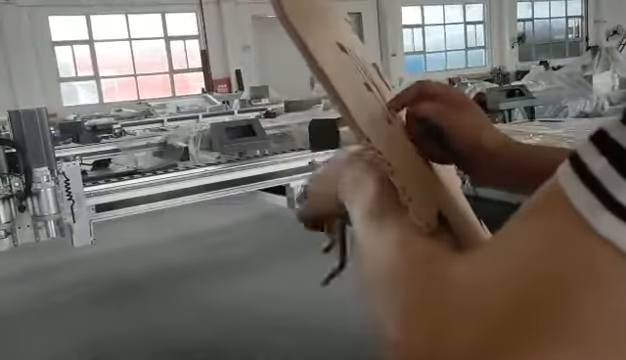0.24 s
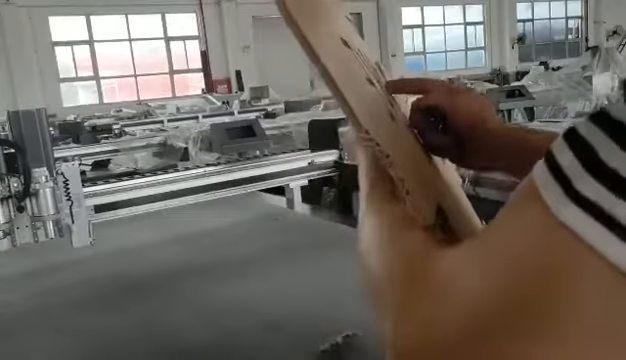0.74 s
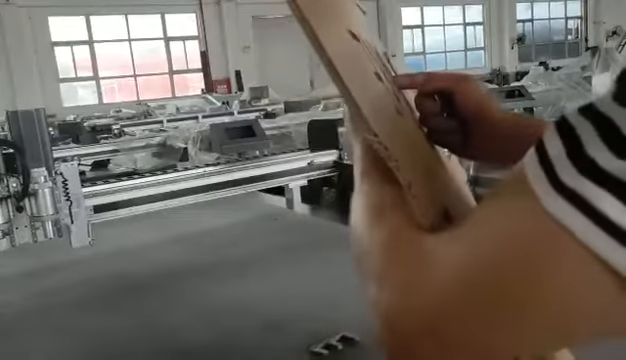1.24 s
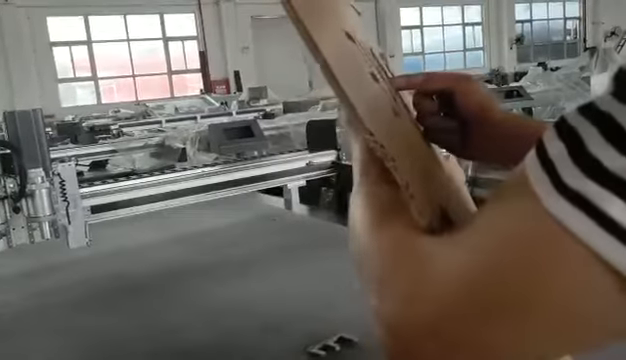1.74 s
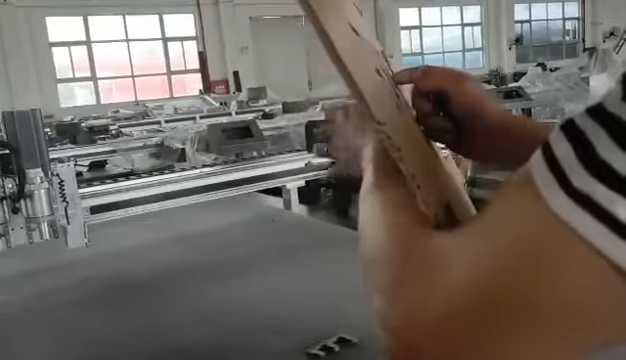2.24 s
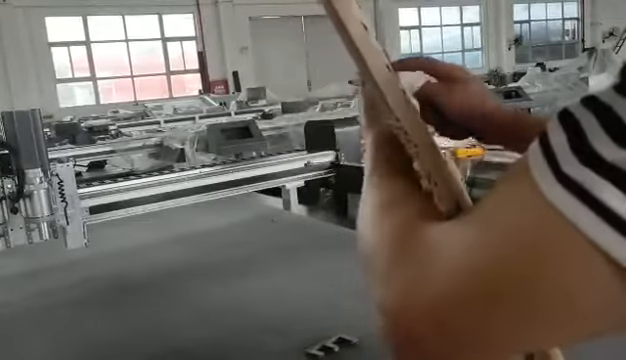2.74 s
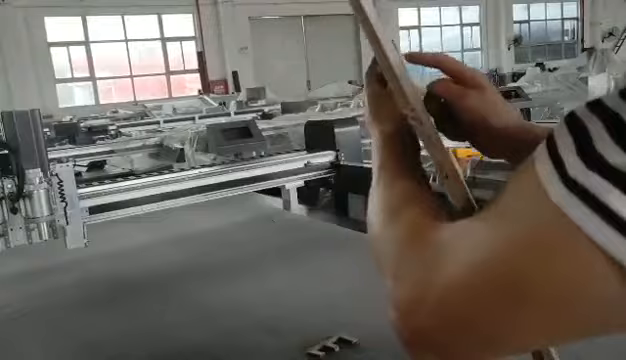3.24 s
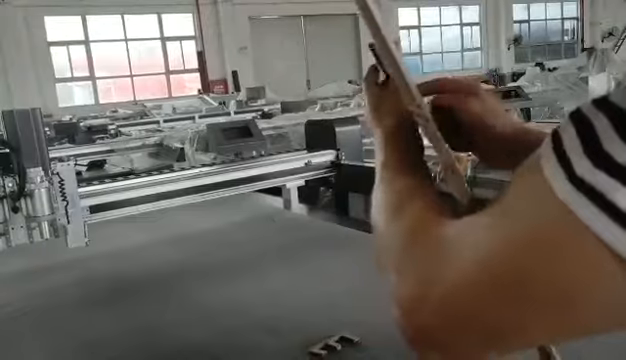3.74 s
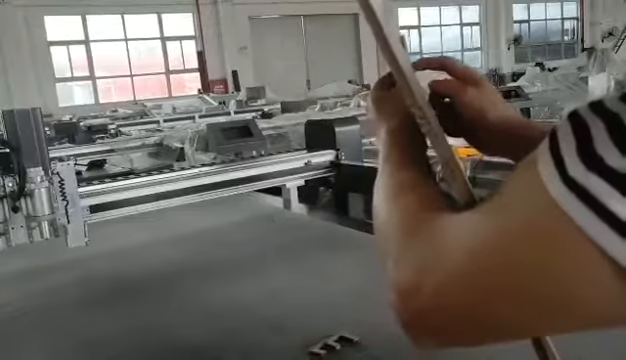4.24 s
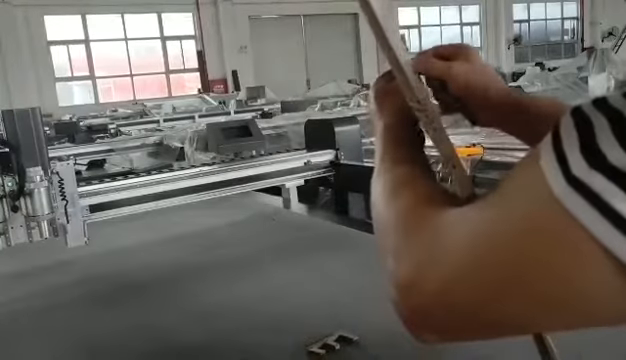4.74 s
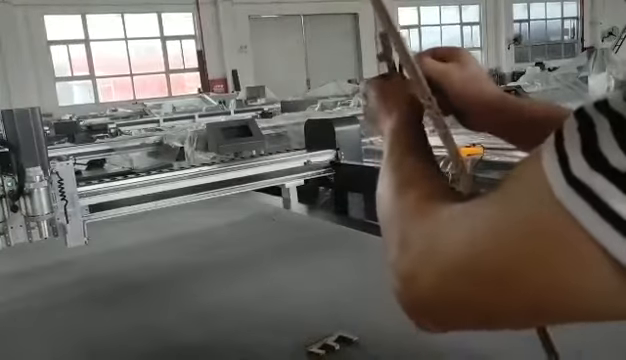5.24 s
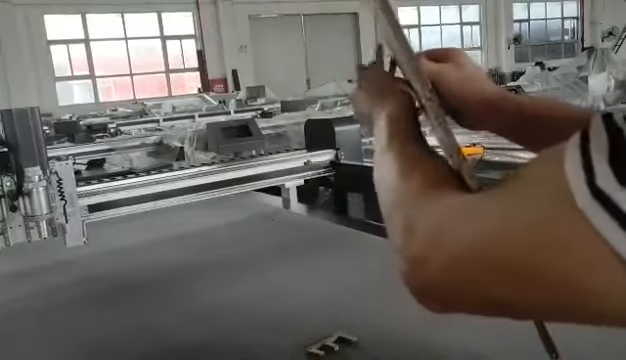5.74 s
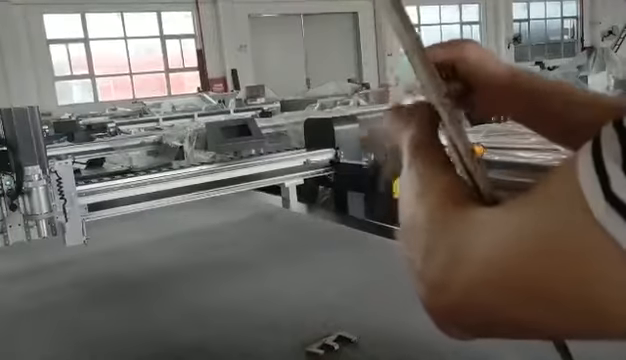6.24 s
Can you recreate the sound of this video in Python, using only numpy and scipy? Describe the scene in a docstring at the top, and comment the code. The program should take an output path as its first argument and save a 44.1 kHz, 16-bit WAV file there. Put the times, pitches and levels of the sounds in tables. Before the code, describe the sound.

Cardboard breaks apart by hand in a big hall: crisp irregular clicks, a little rattle around two seconds, then a dense loud crackle just after three and more hard snaps soon after. Sparser, softer ticks lead to a last tight group near six. Most cracks sit slightly left, close and dry, with a short room tail. Behind are faint air noise, swelling hum and dull far-off booms.

```python
"""Cardboard pieces pushed out in a workshop

Fingers push pre-cut pieces out of a cardboard sheet: the board crinkles and rattles (random ticks), fibre
bridges snap in quick clusters (noisy pulses through ringing bodies) and shed loose fibres. The stiff sheet
knocks at many breaks, and a big hall (decaying noise) rings after them. Behind lie steady ventilation and
drone, a faint hum that swells and fades, and far-off rumbles and booms (bands of noise). The recorder's
noise suppressor turns down faint treble.
"""
import sys
import numpy as np
from scipy import signal
from scipy.fft import rfft, irfft, next_fast_len
from scipy.io import wavfile
from scipy.ndimage import uniform_filter1d, map_coordinates

SR = 44100
rng = np.random.default_rng(int(sys.argv[2]) if len(sys.argv) > 2 else 0)


def wav_record(signal):
    """Record a signal, one row per channel, as 16-bit PCM in the file named by sys.argv[1]."""
    frames = np.transpose(np.atleast_2d(signal))
    bounded = np.clip(frames, -1, 1)
    # unit amplitude maps onto the largest positive 16-bit level
    quanta = np.round(bounded * 32767).astype(np.int16)
    wavfile.write(sys.argv[1], SR, quanta)


N = 286650

# Fibre bridges breaking: (time [s], crack level [dB], flex level [dB], crack left over right [dB])
BREAKS = [(0.1318, -30, -50, 11), (0.1504, -24.5, -46.5, 6), (0.392, -31, -59.5, 12),
          (0.5476, -30.5, -44, 0), (0.7629, -30, -50, 4.5), (0.843, -44, -62, -5), (0.8724, -36, -52, 9),
          (0.8874, -28.5, -57.5, 4), (1.1905, -30, -58.5, 9.5), (1.26, -32.5, -82, 7), (1.296, -22, -72, 5),
          (1.314, -36, -83, 10), (1.3347, -28.5, -57.5, 0), (1.4886, -37, -57.5, 2),
          (1.581, -37, -66.5, 10), (1.639, -34, -83, 5), (1.6896, -17.5, -38, 3.5), (1.707, -26, -57, 8.5),
          (1.7844, -32, -61, 1), (1.7938, -21, -40, 4), (1.8612, -25.5, -51.5, 0.5), (2.085, -33, -59.5, 5),
          (2.4929, -52, -63, -21), (2.6913, -46, -54, -8.0), (2.7376, -39.5, -49, 4),
          (2.7913, -32.5, -72, 4), (2.8074, -33, -63, 11.0), (2.814, -26, -46.5, 0.5),
          (3.0604, -38.5, -80.5, 6), (3.1106, -24, -58, 5), (3.1401, -21, -39.5, 10),
          (3.1561, -15.5, -34, 7.5), (3.1704, -21.5, -38, 8), (3.1789, -30.5, -39, 1),
          (3.5696, -32, -62.5, 7.5), (3.6466, -16.5, -39, 2), (3.6534, -17.5, -37, 8), (3.672, -25, -39, 9),
          (3.9707, -33, -51, -2.5), (4.581, -28, -47, 6), (4.6705, -28, -54.5, 2.5),
          (4.6939, -31.5, -57.5, -3), (4.8045, -44, -56.5, -0.5), (4.9671, -28, -58, -3),
          (5.1216, -40, -80, 8), (5.1608, -40.5, -85.5, 7.5), (5.5118, -30, -85, 3.5),
          (5.777, -33, -49.5, 8), (5.9208, -37.5, -70, 6), (5.9463, -19.5, -45.5, 7),
          (5.9785, -38, -45.5, 8), (5.9869, -21.5, -46, 3.5), (6.2214, -39, -88, 1),
          (6.2507, -33.5, -68.5, 2.0), (6.3948, -39.5, -62, 5)]
# Sheet knocks as a piece lets go: (time [s], level [dB], pitch [Hz])
SHEET_KNOCKS = [(0.15, -42, 1264), (0.766, -45.5, 414), (1.687, -52.5, 1080), (1.792, -38.5, 1165),
                (1.854, -50.5, 455), (2.491, -47, 803), (2.691, -50, 674), (3.144, -41.5, 595),
                (3.157, -39.5, 960), (3.177, -36.5, 301), (3.646, -34.5, 1100), (3.654, -42.5, 1180),
                (3.674, -44, 840), (4.968, -54.5, 1046), (5.775, -44, 1000), (5.939, -38, 1010),
                (5.959, -44, 880), (5.977, -38.5, 1000), (5.987, -44.5, 806)]
# Crinkles and rattles of the board, by finger pushes or a falling piece: (time [s], level [dB], rise [s])
CRINKLE_SWELLS = [(.03, -61, 0.26), (0.388, -48, 0.004), (0.719, -64, 0.0063), (0.871, -54, 0.022),
                  (1.18, -62.5, 0.064), (1.219, -51, 0.0032), (1.48, -54.5, 0.012), (1.75, -51, 0.043),
                  (1.855, -38.5, 0.0047), (2.092, -46.5, 0.013), (2.256, -61, 0.011), (2.745, -50, 0.015),
                  (3.073, -49, .005), (3.102, -47.5, 0.014), (3.158, -28.5, 0.012), (3.28, -41.5, .014),
                  (3.911, -49, 0.011), (4.446, -62.5, 0.021), (4.487, -55, 0.0048), (4.963, -49.5, .004),
                  (5.461, -54, 0.023), (5.507, -49, 0.019), (5.602, -57, .003), (5.642, -56.5, 0.008),
                  (5.792, -57, 0.023)]
# Colour of torn fibres: (frequency [Hz], gain [dB])
CRACK_COLOUR = [(2500, -43.5), (3900, -52), (4700, -7.5), (5800, -5), (7400, 12), (8400, 5), (9500, -3),
                (12000, -9.5), (14800, -17.5), (16500, -51.5)]
# Colour of the flexing piece: (frequency [Hz], gain [dB])
FLEX_COLOUR = [(1000, -29.5), (1650, -3.5), (2200, -5), (2900, 1), (3600, 0.5), (4600, 0), (5300, -5),
               (7000, -29.5)]
# Colour of the whole sheet: (frequency [Hz], gain [dB])
KNOCK_COLOUR = [(120, -31), (270, -11), (400, -3), (620, -6.5), (1100, -6.5), (1400, -10.5), (2100, -6),
                (3000, -27.5)]
# Hall decay by band, before stretching and the final drop: (frequency [Hz], T60 [s])
HALL_T60 = [(200, 0.92), (1000, 0.28), (4000, 0.31), (7500, 0.43), (14000, 0.37)]
# Colour of the hall's answer: (frequency [Hz], gain [dB])
HALL_GAIN = [(200, 9), (1000, 6.5), (3000, 5.5), (6000, 5.5), (8000, -2.5), (11000, 3), (15000, 7.5)]
# Hall ringing after a big break: (frequency [Hz], relative level [dB per Hz])
AFTERRING_COLOUR = [(120, -36), (200, -9.5), (332, -20), (383, -7), (503, -12.5), (647, -14), (734, -25),
                    (1070, -0.5), (1240, -6), (2850, -1.5), (4160, -3), (7280, 7.5), (15000, -73)]
# Swells of the faint hum: (time [s], level [dB], rise [s])
HUM_SWELLS = [(.03, -60.5, 0.033), (.73, -66.5, 0.037), (.97, -66, 0.061), (1.62, -67, 0.015),
              (2.178, -67.5, 0.021), (2.682, -57, 0.021), (3.031, -54.5, .018), (3.168, -54.5, 0.029),
              (3.922, -50, 0.032), (4.14, -63.5, 0.12), (5.63, -66.5, 0.035), (6.4, -62, 0.029)]
# Distant rumbles, even rise and fall: (middle [s], level [dB], time to fall by 20 dB [s])
FAR_RUMBLES = [(1.0, -79, 0.94), (3.33, -59, 0.18), (4.14, -45, 0.4722)]
# Colour of the rumbles: (frequency [Hz], relative level [dB per Hz])
RUMBLE_SPECTRUM = [(100, -43), (190, -16), (300, 4.5), (430, 5.5), (540, -11.5), (720, -14), (950, -28.5),
                   (1400, -31.5), (2500, -58.5)]
# Far-off hollow booms: (time [s], pitch [Hz], level [dB])
FAR_BOOMS = [(.26, 278, -61.5), (0.852, 273, -57.5), (.91, 531, -61), (.97, 780, -65), (1.11, 560, -66),
             (1.16, 930, -72.5), (1.239, 277, -66.5), (3.309, 333, -47.5), (3.31, 750, -64.5),
             (3.961, 436, -51), (4.11, 209, -57), (4.13, 308, -48), (4.18, 741, -60), (4.65, 406, -64.5)]
# Ventilation: (frequency [Hz], relative level [dB per Hz])
VENTILATION_COLOUR = [(15, -37.5), (28, -6), (60, -2.5), (114, -9), (212, -7.5), (263, -12), (363, -21),
                      (640, -18), (936, -23.5), (2600, -22.5), (4500, -27), (7300, -24), (9000, -26.5),
                      (11000, -26.5), (13000, -36.5), (16000, -57.5)]
# Diffuse sound, likeness of the channels: (frequency [Hz], left-right correlation [-1 to 1])
DIFFUSE_LIKENESS = [(60, 1), (130, 0.94), (300, 0.89), (640, 0.17), (1400, 0.047), (3000, -0.23)]
# Diffuse sound, balance: (frequency [Hz], left over right [dB])
DIFFUSE_PAN = [(100, 4), (400, 5.5), (1200, 4.5), (2500, 1.5), (4500, 7.5), (8000, 3.5)]

LEAD_S = 0.006  # fibres start to give this long before they part
TEAR_S, TEAR_SCATTER = 0.0021, 0.2  # fibres of one bridge part within this time; scatter as log deviation
CRACK_S, FLEX_S, KNOCK_S = 0.00099, 0.012, 0.004  # energy equals the level held this long
KNOCK_PAN_DB, FLEX_RIGHT_DB = -6, 9  # knock left over right; flex this much right of its crack
LOOSE_DB, LOOSE_T60_S = -26.5, 0.18  # loose-fibre crackle: level against its crack, decay
BOOM_RISE_S = 0.029
TOP_HZ = 15500  # recorder band limit


def cardboard():
    """The board crinkles, rattles, snaps, knocks and sheds loose fibres; the hall rings after it."""
    near = crinkling() + loose_fibres()
    for s, *blow in BREAKS:
        add(near, snap(*blow), s - LEAD_S)
    for s, db, pitch_hz in SHEET_KNOCKS:
        add(near, knock(db, pitch_hz), s - LEAD_S)
    far = earlier_break()
    step = SR // 5
    for start in range(0, N, step):  # the hall's noise is drawn afresh every fifth of a second
        add(far, hall(near[:, start:start + step], wet_db=-4.0), start / SR)
    return near + far


def snap(crack_db, flex_db, pan_db):
    """One break: a bright crack and the duller flex of the piece."""
    length_s = TEAR_S * np.exp(TEAR_SCATTER * rng.standard_normal())
    crack = tear(length_s, fuzz=1.2, fuzz_t60_s=0.007, apart=0.7, lead_db=-17)
    flex = tear(length_s, fuzz=1.6, fuzz_t60_s=0.021, apart=0.92, lead_db=-13)
    crack_body = ring(CRACK_COLOUR, ripple_db=1.0)
    flex_body = ring(FLEX_COLOUR, ripple_db=2.5)
    return (radiate(crack, crack_body, crack_db, CRACK_S, pan_db)
            + radiate(flex, flex_body, flex_db, FLEX_S, pan_db - FLEX_RIGHT_DB))


def knock(db, pitch_hz):
    """The longer, woody knock of the whole sheet, with one raised resonance."""
    force = tear(TEAR_S, fuzz=5.4, fuzz_t60_s=0.061, apart=1.0, lead_db=-18.5)
    body = ring(KNOCK_COLOUR, ripple_db=5.5, pitch_hz=pitch_hz, pitch_db=15.5)
    return radiate(force, body, db, KNOCK_S, KNOCK_PAN_DB)


def crinkling():
    """Bright fibre ticks that swell with each push or rattle."""
    level = sum(swell(*row, linger=1.0) for row in CRINKLE_SWELLS)
    return level * crinkle(rate_hz=1400, spread_db=8.5, flex_db=-15.5, tilt_db=2)


def loose_fibres():
    """Duller ticks that start at each break and die away."""
    t = np.arange(SR // 2) / SR
    loosened = np.zeros((1, N))
    for s, crack_db, *_ in BREAKS:
        add(loosened, amp(crack_db + LOOSE_DB - 60 * t[None] / LOOSE_T60_S), s)
    return loosened * crinkle(rate_hz=600, spread_db=10.0, flex_db=-11.5, tilt_db=-5.5)


def crinkle(rate_hz, spread_db, flex_db, tilt_db, count=5):
    """Random fibre ticks of a few colours, rms 1; tilt_db per octave brighter than a crack."""
    colour = [(hz, db + tilt_db * np.log2(hz / TOP_HZ * 2)) for hz, db in CRACK_COLOUR]
    grains = np.zeros((2, N))
    for _ in range(count):
        sizes = amp(spread_db * np.clip(rng.standard_normal(N), -2, 2))
        signs = np.sign(rng.standard_normal(N))
        ticks = (rng.random(N) < rate_hz / count / SR) * sizes * signs
        body = ring(colour, ripple_db=3.0) + amp(flex_db) * ring(FLEX_COLOUR)
        force = tear(0.00091, fuzz=1.7, fuzz_t60_s=0.0027, apart=1.0)
        tick = signal.fftconvolve(force, body[None], axes=1)
        grains += signal.oaconvolve(ticks[None], unit(tick), axes=1)[:, :N]
    return sides(1.4) * unit(grains)


def tear(length_s, fuzz, fuzz_t60_s, apart, lead_db=-13, count=4, size=2048):
    """Stereo force of a break: the board starts to give, then fibres part in turn, each shaking it."""
    lead = round(LEAD_S * SR)
    t = (np.arange(size) - lead) / SR
    jitter = rng.uniform(0, 1, count) * (np.arange(count) > 0)  # the first fibre parts at once
    when = (np.arange(count) + jitter) / count
    position = (when * np.clip(length_s, 0, 0.02) * SR).astype(int)
    strength = amp(rng.normal(0, 2.1, count) - 0.73 * when)
    fibres = np.bincount(position, strength, size)
    envelope = amp(np.where(t < 0, lead_db + 14 * t / LEAD_S, -60 * t / fuzz_t60_s))
    common = rng.standard_normal(size)
    shake = (common + apart * rng.standard_normal((2, size))) * envelope
    shake *= fuzz / np.linalg.norm(shake[0])
    shake[:, lead] += 1  # the clean parting pulse
    return signal.fftconvolve(fibres[None], shake, axes=1)[:, :size]


def ring(colour, ripple_db=0.0, pitch_hz=1000, pitch_db=0.0, ripple_hz=330, size=2048):
    """Minimum-phase body response: colour, random peaks and dips of each piece, one resonance."""
    hz = np.fft.rfftfreq(size, 1 / SR)
    ripple = map_coordinates(rng.standard_normal(size), [hz / ripple_hz], order=2)
    peak_db = pitch_db * resonance(hz, pitch_hz, width_hz=160)
    cepstrum = irfft(np.log(amp(along(colour, hz) + ripple_db * ripple + peak_db)))
    cepstrum[1:size // 2] *= 2  # fold to make it causal
    cepstrum[size // 2 + 1:] = 0
    return irfft(np.exp(rfft(cepstrum)))


def radiate(force, body, db, held_s, pan_db):
    """A force through a ringing body, with the energy of db held for held_s, at two microphones."""
    sound = signal.fftconvolve(force, body[None], axes=1)
    gain = amp(db) * np.sqrt(held_s * SR / sound.shape[1])
    left, right = gain * sides(pan_db) * unit(sound)
    lag = rng.integers(7, 10)  # the left microphone is a few samples nearer
    return np.array([left, np.roll(right, lag)])


def hall(x, wet_db, build_s=0.001, fall_s=0.24):
    """Hall reverberation, cut short as if by a noise suppressor.

    Noise builds up, dies band by band, then drops steeply after about fall_s.
    """
    hz, t, z = signal.stft(diffuse(np.ones_like, count=SR // 2), SR, nperseg=256)
    decay = amp(-60 * t / along(HALL_T60, hz)[:, None] - 10 * (t / fall_s) ** 3)
    fade = decay * (1 - np.exp(-t / build_s))
    colour = amp(along(HALL_GAIN, hz))[:, None]
    tail = signal.istft(z * fade * colour, SR, nperseg=256)[1]
    return amp(wet_db) * signal.fftconvolve(x, tail / np.linalg.norm(tail[0]), axes=1)


def earlier_break(start_db=-39, slower=2.36, fall_s=0.62):
    """The hall still rings from a piece that broke out a moment earlier: noise decaying band by band."""
    noise = diffuse(lambda hz: amp(along(AFTERRING_COLOUR, hz)))
    hz, t, z = signal.stft(noise, SR, nperseg=256)
    t60_s = slower * along(HALL_T60, hz)[:, None]
    fade = amp(start_db - 60 * t / t60_s - 10 * (t / fall_s) ** 3)
    return signal.istft(z * fade, SR, nperseg=256)[1][:, :N]


def machine_hum():
    """A sine and a narrow noise band just above it, faint, swelling and fading."""
    t = np.arange(N) / SR
    band = diffuse(lambda hz: resonance(hz, centre_hz=661.4, width_hz=60))
    whine = np.sin(2 * np.pi * 646 * t) + 0.4 * band
    level = amp(-79.5) + sum(swell(*row) for row in HUM_SWELLS)
    return level * unit(whine)


def rumbles():
    """Far-off low noise, rising and falling evenly."""
    t = np.arange(N) / SR
    level = sum(amp(db - 20 * ((t - s) / fall_s) ** 2) for s, db, fall_s in FAR_RUMBLES)
    return level * diffuse(lambda hz: amp(along(RUMBLE_SPECTRUM, hz)))


def booms():
    """Far-off hollow booms: swells of narrow-band noise."""
    out = np.zeros((2, N))
    for s, pitch_hz, db in FAR_BOOMS:
        boom = np.zeros((2, N))
        noise = diffuse(lambda hz: resonance(hz, pitch_hz, width_hz=57), count=SR)
        add(boom, noise, s - 1 / 3)
        out += swell(s, db, BOOM_RISE_S) * boom
    return out


def drone():
    """Steady drone: two very narrow noise bands."""
    def gain(hz):
        upper = resonance(hz, centre_hz=263.0, width_hz=7)
        lower = resonance(hz, centre_hz=58.3, width_hz=6.2)
        return upper + amp(-2) * lower
    return amp(-76.0) * diffuse(gain)


def ventilation():
    """Steady coloured noise of moving air."""
    return amp(-67.5) * diffuse(lambda hz: amp(along(VENTILATION_COLOUR, hz)))


def diffuse(gain, count=N):
    """Stereo noise of rms 1 from all over the hall: mid and side are mixed to set the likeness."""
    def spread(hz):
        turn = np.arccos(np.clip(along(DIFFUSE_LIKENESS, hz), -1, 1)) / 2
        return gain(hz) * np.array([np.cos(turn), np.sin(turn)])
    mid, side = filtered(rng.standard_normal((2, count)), spread)
    stereo = np.array([mid + side, mid - side])
    return unit(filtered(stereo, lambda hz: sides(along(DIFFUSE_PAN, hz))))


def swell(s, db, rise_s, linger=2.05):
    """Gain of a rounded swell peaking at s; its fall takes linger times its rise."""
    t = np.arange(N) / SR - s
    u = np.where(t < 0, t, t / linger) / rise_s
    return amp(db) * np.exp(2.0 * (1 - np.sqrt(1 + u ** 2)))


def resonance(hz, centre_hz, width_hz):
    """Gain of one resonance; width at half gain."""
    return 1 / (1 + (2 * (hz - centre_hz) / width_hz) ** 2)


def filtered(x, response):
    """x times a response of frequency."""
    n = x.shape[-1]
    m = next_fast_len(n + SR // 4)
    return irfft(rfft(x, m) * response(np.fft.rfftfreq(m, 1 / SR)), m)[..., :n]


def along(points, hz):
    """(frequency [Hz], value) points read on a log frequency axis."""
    f, v = np.transpose(points)
    return np.interp(np.log(hz + 1), np.log(f + 1), v)


def sides(db):
    """Left and right gains for a left-over-right difference, mean power 1."""
    g = amp(np.array([db, -db]).reshape(2, -1) / 2)
    return g / np.sqrt(np.mean(g ** 2, axis=0))


def amp(db):
    """Decibels to gain."""
    return 10 ** (np.asarray(db) / 20)


def unit(x):
    """Scale to rms 1."""
    return x / np.sqrt(np.mean(x ** 2) + 1e-20)


def add(out, x, s):
    """Mix x into out from time s."""
    start = max(round(s * SR), 0)
    n = min(x.shape[1], out.shape[1] - start)
    out[:, start:start + n] += x[:, :n]


def scene():
    """The cardboard in its workshop."""
    workshop = machine_hum() + rumbles() + booms() + drone() + ventilation()
    return cardboard() + workshop


def suppress(x, threshold_db=-97, depth_db=-11, above_hz=3200):
    """Noise suppressor: treble that sinks to the threshold is turned down further."""
    hz, t, z = signal.stft(x, SR, nperseg=1024)
    power = np.mean(np.abs(z) ** 2, axis=0)
    power = uniform_filter1d(power, size=3, axis=0)  # smooth over frequency
    power = np.abs(uniform_filter1d(power, size=2, axis=1))  # smooth over time
    closed = 1 / (1 + (power / amp(threshold_db) ** 2) ** 2)
    reach = 1 / (1 + (above_hz / (hz[:, None] + 1)) ** 6)
    return signal.istft(z * amp(depth_db * closed * reach), SR, nperseg=1024)[1][:, :N]


def record(dry):
    """Noise suppression, then the recorder's band limit."""
    return filtered(suppress(dry), lambda hz: 1 / (1 + (hz / TOP_HZ) ** 80))


dry = scene()
out = record(dry)
wav_record(out)
```